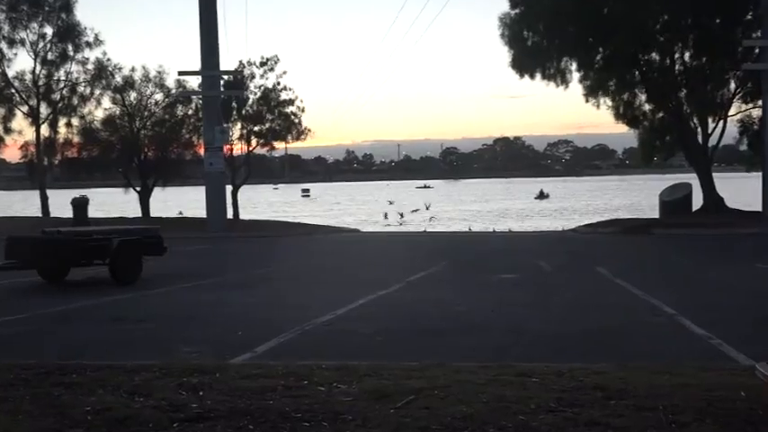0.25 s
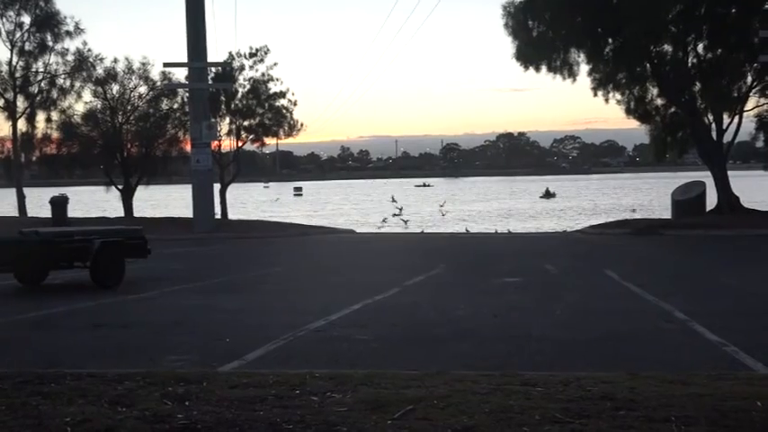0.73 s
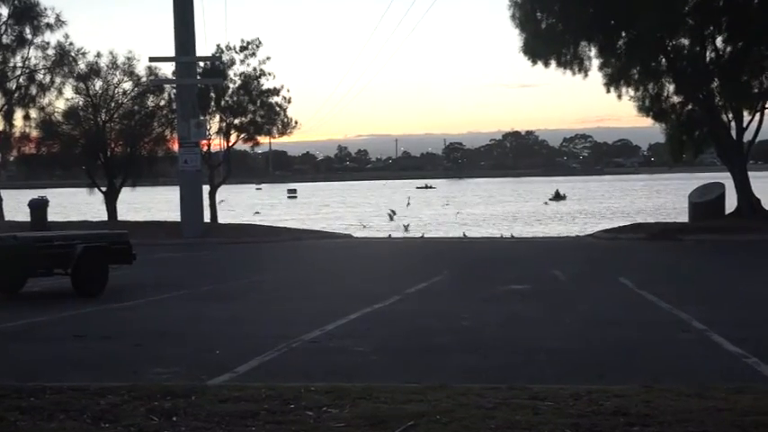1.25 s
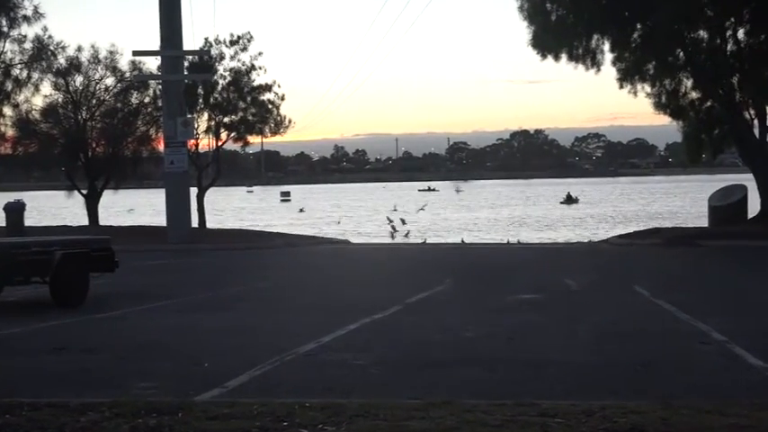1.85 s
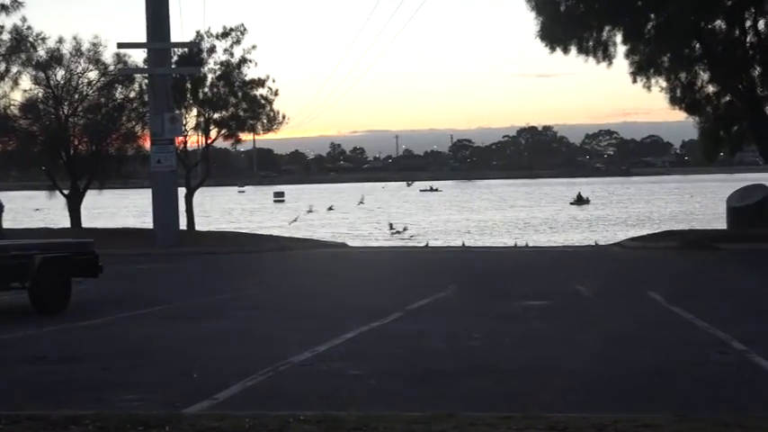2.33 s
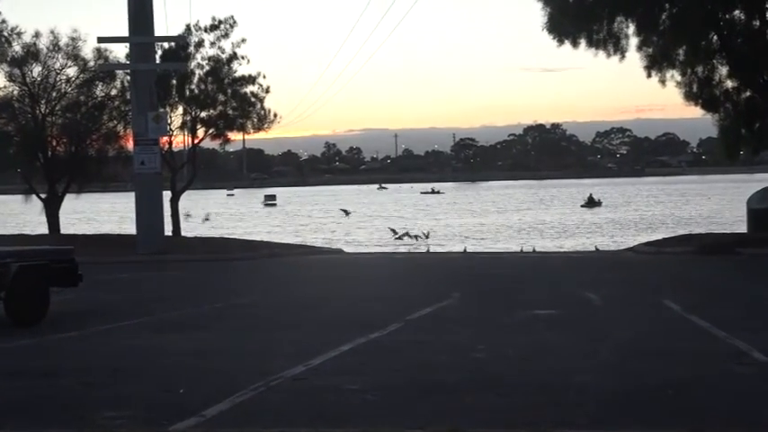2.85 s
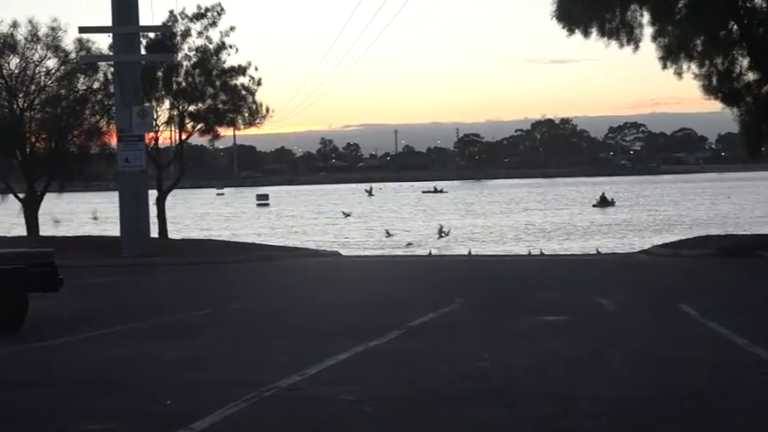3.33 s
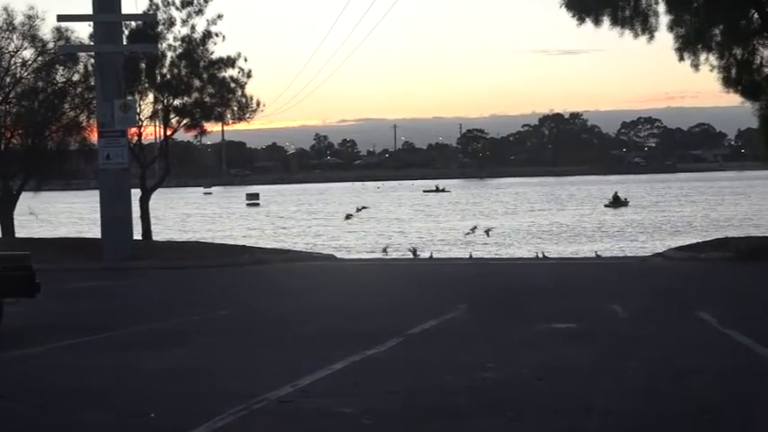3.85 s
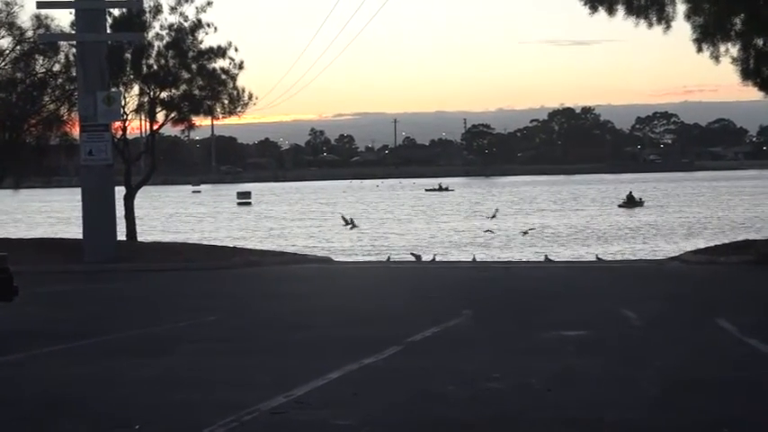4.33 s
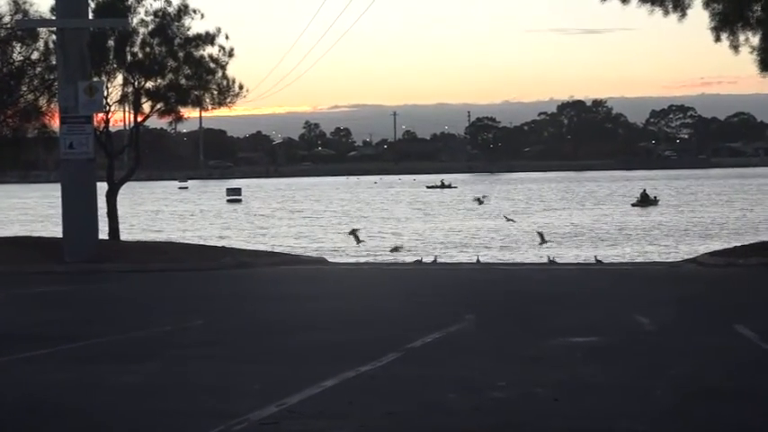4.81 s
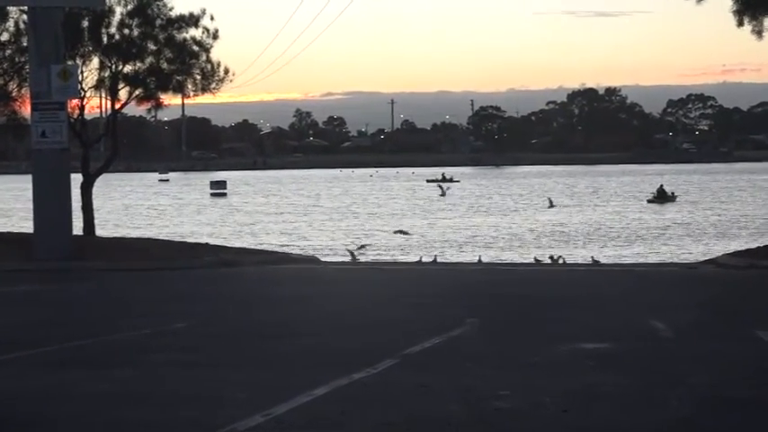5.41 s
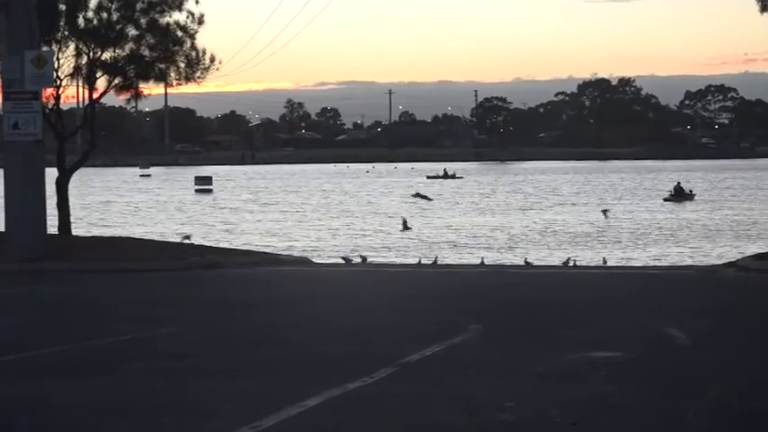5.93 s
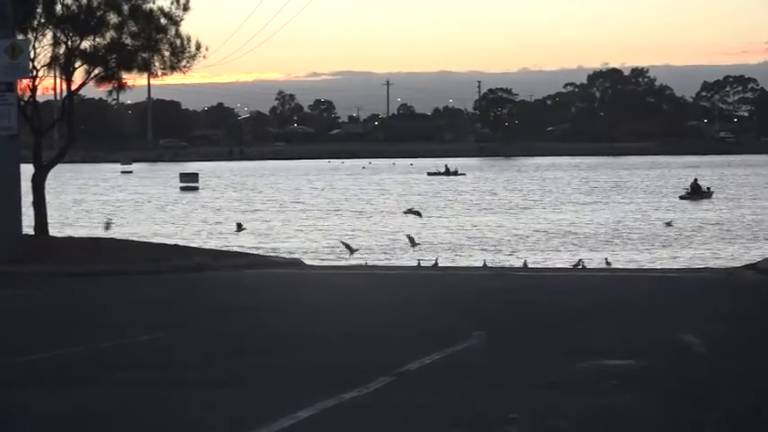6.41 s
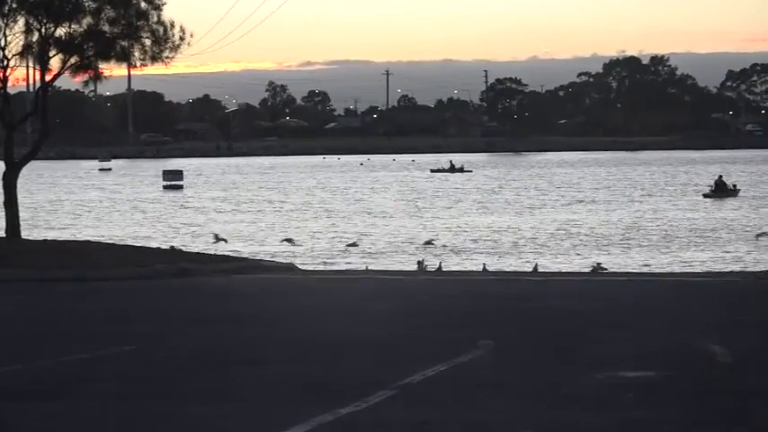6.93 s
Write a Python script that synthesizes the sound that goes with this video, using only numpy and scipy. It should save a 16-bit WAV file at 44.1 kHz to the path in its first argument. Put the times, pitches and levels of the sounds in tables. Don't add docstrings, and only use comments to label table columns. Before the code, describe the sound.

A flock of gulls squawks beside a lake, distant chatter giving way to ever nearer, harsher screeches and shrill whistles, with wind thudding on the microphone.

```python
import sys
import numpy as np
from scipy import signal
from scipy.fft import rfft, irfft, next_fast_len
from scipy.io import wavfile
from scipy.ndimage import uniform_filter1d

SR = 44100
rng = np.random.default_rng(int(sys.argv[2]) if len(sys.argv) > 2 else 0)


def nominal_scale(level):
    x = np.asarray(level, float) / 20
    return 10 ** x


def unload_audio(sound):
    columns = np.transpose(np.atleast_2d(sound))
    steps = np.round(np.clip(columns, -1, 1) * 32767)
    wavfile.write(sys.argv[1], SR, steps.astype(np.int16))


N = 316197
TIME = np.arange(N) / SR


def unit_power(x):
    return x / np.sqrt(np.mean(x ** 2) + 1e-20)


def in_time(rows):
    s, *columns = np.transpose(rows)
    return [np.interp(TIME, s, column) for column in columns]


def colour(x, points):
    hz, db = np.transpose(points)
    size = next_fast_len(N, real=True)
    log_hz = np.log(np.arange(size // 2 + 1) * SR / size + 1e-3)
    weight = nominal_scale(np.interp(log_hz, np.log(hz), db, -90, -90))
    return unit_power(irfft(rfft(x, size) * weight, size)[:N])


def drift(rate_hz):
    r = np.exp(-2 * np.pi * rate_hz / SR)
    return unit_power(signal.lfilter([1], [1, -2 * r, r * r], rng.standard_normal(N + SR))[SR:])


def sweep(hz):
    return 2 * np.pi * np.cumsum(hz) / SR


def rough_voice(pitch_hz, chaos, breath, depth=.45):
    climb = np.cumsum(42 * np.exp(.5 * drift(8)) / SR) % 1
    shake = sweep(115 * np.exp(.15 * drift(10)))
    lurch = .24 * climb - .12 + .065 * drift(90) + .045 * np.cos(shake)
    phase = sweep(pitch_hz * np.exp(chaos * lurch))
    stack = sum(np.sin(k * phase + k * k) * (k * pitch_hz < 13500) for k in range(1, 15))
    uneven = 1 + .5 * chaos * (drift(20) > .3) * np.sin(phase / 2)
    rattle = 1 + depth * chaos * np.sin(shake)
    return nominal_scale(1.82 * drift(52)) * rattle * (unit_power(stack * uneven) + breath * rng.standard_normal(N))


# frequency in Hz, level in dB.
NEAR_THROAT = [(900, -19.5), (1340, -13.5), (2100, -11), (2600, -2.5), (3800, 4), (4700, -0.5), (5250, 1),
               (6500, -12.5)]
# frequency in Hz, level in dB.
BEAK = [(5800, -49), (6500, -1.5), (7500, 1), (8600, -10.5), (10000, -13.5), (11800, -8.5), (14000, -17),
        (15500, -22)]
# frequency in Hz, level in dB.
CAW = [(1100, -13), (1400, -5), (1700, 4), (2000, -5.5), (2400, -25)]


def through_body(source, throat, gain, bright, hoarse):
    return gain * (colour(source, throat) + bright * colour(source, BEAK) + hoarse * colour(source, CAW))


def stir():
    rise_db_per_s, fall_db_per_s, far_db = 153, 150, -14
    peak = 0.41
    calls = NEAR_SQUAWKS + [(s, length, hz, db + far_db, bright) for s, length, hz, db, bright in FAR_SQUAWKS]
    s = TIME[::64]
    slopes = []
    for start, length, _, db, _ in calls:
        to_come = rise_db_per_s * (start + peak * length - s)
        gone_by = fall_db_per_s * (s - start - length)
        slopes.append(db - np.maximum(0, np.maximum(to_come, gone_by)))
    return np.interp(TIME, s, np.max(slopes, axis=0))


def crowd(stir_db):
    first_db, last_db, follows = -54.5, -48.5, 0.25
    level_db = np.linspace(first_db, last_db, N) + follows * (stir_db + 43.5)
    voice = rough_voice(1100, chaos=1.5, breath=0.92, depth=0.094)
    return through_body(voice, NEAR_THROAT, nominal_scale(level_db), bright=nominal_scale(-11.5), hoarse=nominal_scale(-12))


# start in seconds, end in seconds, level in dB.
STEADY_SHRILL = (2.386, 3.3, -42)


def shrill_chorus(stir_db):
    start, end, steady_db = STEADY_SHRILL
    spell_db = steady_db - 40 * np.maximum(0, np.maximum(start - TIME, TIME - end))
    level_db = np.clip(-39 + 0.57 * (stir_db + 31.0), spell_db, -36)
    out = 0
    for hz in (5270, 5380, 5400, 5600):
        phase = sweep(hz * (1 + 0.0085 * drift(10) + .022 * drift(148.8)))
        out = out + nominal_scale(4.2 * drift(38) + 1.1 * drift(90)) * np.sin(phase)
    return nominal_scale(level_db - 8.5) * unit_power(out)


# time in seconds, level in dB.
WIND = [(0.0, -49), (1.04, -47), (1.28, -52), (1.72, -46.5), (2.85, -56.5), (2.87, -49.5), (3.24, -63.5),
        (3.41, -37.5), (3.45, -50.5), (3.91, -60.5), (3.95, -46), (4.57, -56), (4.61, -48.5), (5.63, -53),
        (6.57, -42.5), (6.71, -55.5), (6.89, -43.5), (7.17, -54.5)]
# start in seconds, peak in dB, frequency in Hz.
BUFFETS = [(0.439, -58, 163), (0.534, -36, 183), (0.601, -63, 129), (0.825, -36, 150), (0.927, -45, 118),
           (1.024, -36, 194), (1.461, -31, 95), (1.527, -37, 151.8), (1.676, -34.5, 184.7),
           (1.712, -42, 178), (1.869, -23.5, 212), (2.049, -34.5, 151.4), (2.897, -36.5, 166.7),
           (3.406, -29.5, 109.3), (4.04, -33, 130.9), (4.062, -33.5, 82), (4.622, -33.5, 77.3),
           (3.37, -36, 94), (4.292, -39.5, 128), (4.474, -40.5, 91), (5.312, -34, 91.2), (6.334, -27, 134),
           (6.47, -30.5, 191), (6.54, -41, 143.4), (6.777, -30.5, 118), (6.868, -26, 161),
           (7.023, -30.5, 129.8)]
# frequency in Hz, density in dB per Hz.
GUST = [(15, -11.5), (35, 4), (70, 0.5), (150, -6.5), (300, -13), (600, -24), (1500, -33)]


def wind():
    lumps = nominal_scale(2.5 * drift(18) + .4 * drift(6)) * rng.standard_normal(N)
    out = nominal_scale(in_time(WIND)[0]) * colour(lumps, GUST)
    for s, db, hz in BUFFETS:
        first = round(s * SR)
        cycles = np.maximum(TIME - s, 0)[first:first + SR // 10] * hz
        onset = -np.expm1(-(cycles / .13) ** 2)
        ring = np.sin(2 * np.pi * cycles ** .65) * np.exp(-cycles / 1.1)
        out[first:first + len(cycles)] += nominal_scale(db) * ring * onset
    return out


# frequency in Hz, density in dB per Hz.
FAR_AIR = [(100, -30), (300, -10), (600, -7.5), (950, -0.5), (1300, -8), (3000, -9), (5000, -104),
           (8500, -31), (12000, -34.5), (15500, -41)]


def far_air():
    swells = nominal_scale(1.5 * drift(5))
    return nominal_scale(-56.0) * colour(swells * rng.standard_normal(N), FAR_AIR)


def notes(rows, overtone_db=-24.5):
    out, flutter_db = np.zeros(N), 2.5 * np.tanh(drift(105))
    quaver = drift(120)
    for s, length, start_hz, middle_hz, end_hz, db in rows:
        at = np.arange(round(s * SR), min(N, round((s + length) * SR)))
        x = np.linspace(-1, 1, len(at))
        bend_hz = (start_hz + end_hz) / 2 - middle_hz
        hz = middle_hz + (end_hz - start_hz) / 2 * x + bend_hz * x ** 2
        rasp = .004 if db > -26 else .009 if db > -38 else .022
        phase = sweep(hz * (1 + rasp * quaver[at]))
        edge = np.clip((1 - abs(x)) * length / 0.0073, 0, 1)
        edge = edge * nominal_scale(flutter_db[at] * (.5 if db > -26 else 1))
        second = nominal_scale(overtone_db - 3.3 * (start_hz > 4900) + 4.3 * (end_hz > 1.15 * start_hz))
        out[at] += nominal_scale(db + 8.0 - 1.9 * x) * edge * (np.sin(phase) + second * np.sin(2 * phase))
    return out


def arched(rows, start, end):
    return notes([(s, length, hz * start, hz, hz * end, db) for s, length, hz, db in rows])


def bowed(rows):
    return notes([(s, length, first, first + 0.68 * (last - first), last, db)
                  for s, length, first, last, db in rows])


# start in seconds, length in seconds, start pitch in Hz, end pitch in Hz, rms level in dB.
BENDS = [(4.793, 0.038, 4780, 5375, -38.5), (0.014, 0.03, 3180, 3320, -44.5),
         (0.079, 0.047, 3060, 3265, -41), (2.661, 0.039, 3050, 3395, -36.5),
         (2.748, 0.019, 3150, 3330, -41.5), (3.428, 0.049, 2770, 3270, -48),
         (0.034, 0.013, 4300, 4840, -54), (0.065, 0.014, 4700, 4270, -56), (0.123, 0.04, 4570, 3900, -60),
         (.211, 0.034, 4170, 3610, -50.5), (2.578, 0.17, 4220, 4660, -50), (4.826, 0.011, 2930, 3980, -35),
         (4.91, 0.042, 3830, 4540, -31.5), (5.337, 0.015, 3430, 4580, -30),
         (5.374, 0.007, 3540, 4870, -17), (5.823, 0.046, 1080, 1330, -48),
         (6.634, 0.02185, 1230, 1430, -45), (5.899, 0.011, 2678, 4776, -24.5),
         (5.931, 0.015, 2780, 4750, -20.5), (6.635, 0.033, 2460, 3070, -38.5),
         (6.679, 0.03, 3327, 4570, -32), (6.727, 0.022, 3550, 4505, -29),
         (7.077, 0.016, 3200, 3390, -33.5), (7.094, 0.032, 3510, 3746, -32.5),
         (7.138, 0.011, 3090, 4450, -30.5)]


def bends():
    return bowed(BENDS)


# start in seconds, length in seconds, start pitch in Hz, end pitch in Hz, rms level in dB.
STROKES = [(.216, .04, 3100, 2750, -54), (.253, .014, 2700, 1700, -54), (.278, .055, 1780, 1480, -52),
           (.03, .018, 2450, 2200, -56), (.154, .016, 1700, 1900, -55), (.222, .022, 5000, 5150, -59),
           (1.323, .028, 2300, 1900, -54), (1.244, .022, 3900, 4250, -57), (1.408, .026, 2850, 3250, -50),
           (1.505, .03, 2900, 3050, -50), (1.525, .025, 1900, 1750, -52), (1.563, .036, 2450, 2350, -54),
           (1.563, .036, 3350, 3200, -55), (1.68, .055, 7200, 7150, -63), (1.586, .035, 6100, 6350, -63),
           (1.65, .04, 5950, 5900, -62), (1.698, .012, 1750, 1600, -50), (1.716, .012, 1800, 1650, -51),
           (1.733, .012, 1800, 1600, -50), (1.698, .012, 2350, 2250, -53), (1.733, .012, 2350, 2250, -53),
           (2.822, .024, 2150, 2050, -53), (2.585, .06, 2550, 2750, -58), (.655, .03, 1950, 1650, -49),
           (.872, .03, 3750, 3300, -53), (.922, .018, 2650, 2550, -51), (.738, .02, 3150, 3000, -56),
           (1.982, .026, 2200, 2300, -55), (2.07, .016, 3100, 3300, -48), (1.77, .085, 1500, 1480, -58),
           (3.585, .012, 4600, 4500, -50), (3.665, .035, 1950, 1600, -52), (4.88, .014, 1800, 2050, -43),
           (5.515, .03, 3000, 4300, -47), (4.762, .02, 4100, 4450, -47), (4.775, .02, 3700, 3100, -49)]


def far_strokes():
    return bowed(STROKES)


# start
# in seconds, length in seconds, pitch in Hz, rms level in dB.
WHISTLES = [(4.927, 0.044, 5063, -32), (4.934, 0.045, 5420, -31), (5.292, 0.024, 5150, -28),
            (5.311, 0.027, 5460, -32.5), (5.384, 0.012, 5290, -16.5), (5.852, 0.018, 5230, -29),
            (5.874, 0.02, 5340, -25.5), (5.891, 0.012, 5140, -24), (5.92, 0.015, 5300, -22),
            (5.9, 0.0069, 5270, -23), (5.943, 0.022, 5114, -14.5), (5.961, 0.012, 5180, -17),
            (5.969, 0.015, 5190, -16.5), (6.006, 0.064, 5680, -37.5), (6.07, 0.066, 5670, -46),
            (6.7, 0.0069, 5230, -20.5), (6.721, 0.011, 5046, -35), (6.741, 0.0477, 5323, -23.5),
            (6.79, 0.041, 5160, -31), (6.832, 0.026, 5120, -31.5), (7.152, 0.017, 5050, -24.5),
            (7.163, 0.008, 5680, -24.5), (.046, 0.019, 5350, -50.5), (.88, 0.059, 5600, -53),
            (1.82, 0.02, 5300, -54), (2.026, 0.05, 5400, -58),
            (1.16, .026, 5550, -57), (1.238, .016, 5350, -55), (2.205, .02, 5300, -50),
                (2.448, .04, 5450, -44), (2.63, .024, 5400, -49), (2.7, .035, 5400, -45),
                (2.85, .03, 5400, -48), (2.97, .03, 5400, -49), (3.125, .07, 5350, -47),
                (4.29, .07, 5350, -42), (4.36, .045, 5150, -43), (4.425, .03, 5400, -42),
                (5.54, .032, 5330, -36), (5.988, .008, 5200, -28), (4.865, .008, 5050, -33),
                (4.845, .012, 5200, -35)]


def whistles():
    return arched(WHISTLES, start=0.99, end=1.002)


# start in seconds, length in seconds, middle pitch in Hz, rms level in dB.
CLUCKS = [(.051, 0.056, 1620, -51.5), (.156, 0.022, 2160, -45.5), (.285, 0.049, 2420, -51.5),
          (.528, 0.048, 1865, -51), (.667, 0.016, 2260, -42.5), (.885, 0.024, 1920, -49),
          (.89, 0.018, 2470, -45.5), (1.232, 0.024, 2150, -48), (1.947, 0.019, 1864, -54),
          (2.064, 0.016, 2190, -45), (3.532, 0.015, 2380, -43.5), (3.834, 0.03, 2325, -48.5),
          (4.63, 0.048, 1880, -46), (4.66, 0.021, 1634, -42), (6.669, 0.0159, 1870, -34.5),
          (6.748, 0.043, 3440, -35), (6.801, 0.021, 3580, -36.5), (6.958, 0.046, 3116, -54),
          (6.97, 0.057, 1775, -48), (7.063, 0.043, 3730, -37.5), (7.104, 0.012, 4535, -30)]


def clucks():
    return arched(CLUCKS, start=1.015, end=0.96)


# start in seconds, length in seconds, lowest pitch in Hz, rms level in dB.
CHATTER = [(.142, 0.011, 2920, -41), (.153, 0.04, 3100, -51), (.53, 0.038, 2840, -49.5),
           (.652, 0.016, 2850, -44), (.805, 0.012, 2900, -43), (1.23, 0.027, 3170, -48.5),
           (1.307, 0.018, 3080, -41), (1.384, 0.021, 2890, -38.5), (1.453, 0.025, 2897, -43),
           (1.471, 0.023, 3083, -41.5), (1.895, 0.024, 2995, -41), (1.922, 0.016, 3200, -39),
           (2.001, 0.011, 3270, -40.5), (2.05, 0.022, 3000, -41.5), (.53, 0.041, 3660, -53.5),
           (2.805, 0.034, 2860, -46.5), (3.24, .031, 4520, -51), (3.269, 0.041, 4370, -51),
           (3.511, 0.02, 3130, -35), (4.137, 0.035, 3590, -53), (6.992, 0.043, 3182, -48)]


def chatter():
    return arched(CHATTER, start=1.06, end=1.027)


def squawks(rows, throat, glide_hz_per_s, caw_db):
    scoop, scoop_s = .15, .02
    pitch_hz, chaos, gate = np.full(N, 1e3), np.ones(N), np.zeros(N)
    db, bright_db = np.full(N, -45.), np.full(N, -20.)
    top_db = max(row[3] for row in rows)
    for start, length, first_hz, level_db, brightness_db in rows:
        end = start + length
        at = slice(round(start * SR), round((end + .03) * SR))
        age = abs(TIME[at] - start)
        glide_hz = glide_hz_per_s * length * np.sqrt(age / length)
        pitch_hz[at] = first_hz + glide_hz - first_hz * scoop * np.exp(-age / scoop_s)
        chaos[at] = np.clip((age / .045) ** 4, .08 if level_db == top_db else .6, 1)
        db[at], bright_db[at] = level_db, brightness_db
        swell = nominal_scale(level_db - 2.5 - 3.0 * (1 - age / (end - start)))
        rise = np.clip(age / 0.033, 0, 1)
        fall = np.clip((end + 0.043 - TIME[at]) / 0.079, 0, 1)
        gate[at] = np.maximum(gate[at], swell * rise * fall)
    breath = np.clip(-.04 * (db + 17), .35, .75) * (.4 + .6 * chaos)
    voice = rough_voice(pitch_hz, chaos, breath)
    return through_body(voice, throat, gate, nominal_scale(bright_db), nominal_scale(caw_db - 0.93 * db))


# start in seconds, length in seconds, first pitch in Hz, level in dB, brightness in dB.
FAR_SQUAWKS = [(0.215, 0.058, 852, -49, -30), (0.493, 0.086, 962, -53.5, -27),
               (0.631, 0.087, 955, -48, -17), (0.792, 0.029, 972, -41, -20), (0.852, 0.1, 980, -44.5, -31),
               (1.377, 0.036, 1017, -31.5, -30), (1.441, 0.14, 1002, -37, -25),
               (1.649, 0.17, 787, -46.5, -27), (1.866, 0.075, 1012, -38, -37), (2.053, 0.21, 966, -38, -21),
               (2.831, 0.49, 901, -49.5, -5.5)]
# frequency in Hz, level in dB.
FAR_THROAT = [(800, 0), (1300, -57), (1800, -44), (2300, 8.5), (3000, 6.5), (3800, 6.5), (4500, -10),
              (6500, -8.5)]


def far_squawks():
    return squawks(FAR_SQUAWKS, FAR_THROAT, glide_hz_per_s=-300, caw_db=-41.0)


# start in seconds, length in seconds, start pitch in Hz, end pitch in Hz, rms level in dB.
LINGERS = [(4.948, .035, 3300, 3060, -46), (4.98, .05, 3050, 3060, -47), (5.03, .13, 3050, 3030, -54),
           (5.04, .058, 3280, 3270, -51), (5.1, .022, 3250, 3200, -48), (5.103, .022, 2350, 2300, -55),
           (4.96, .07, 1500, 1600, -54), (5.05, .06, 1600, 1650, -56), (4.2, .055, 5050, 5450, -49),
           (4.255, .07, 4500, 4250, -47), (4.345, .065, 4350, 4050, -44), (4.285, .04, 3600, 3750, -46),
           (1.92, .095, 4250, 4100, -54), (.715, .06, 5450, 5650, -59), (.765, .04, 960, 940, -56),
           (6.855, .05, 5150, 4950, -38), (4.45, .1, 5400, 5400, -48), (6.01, .04, 1650, 1520, -48),
           (6.435, .03, 1400, 1750, -48)]


def lingers():
    return bowed(LINGERS)


# start in seconds, length in seconds, first pitch in Hz, level in dB, brightness in dB.
NEAR_SQUAWKS = [(2.349, 0.14, 1278, -37, -8.5), (2.62, 0.12, 1257, -39, -7), (2.84, 0.16, 1226, -37.5, -24),
                (3.048, 0.073, 1245, -45.5, -4), (3.278, 0.15, 1237, -42, -10),
                (3.576, 0.11, 1114, -27.5, -21.5), (3.828, 0.11, 1200, -32, -12),
                (4.194, 0.15, 1283, -37.5, -7.5), (4.277, 0.14, 1298, -27, -10.5),
                (4.606, 0.13, 886, -35.5, -12.5), (4.79, 0.16, 1043, -24.5, -6.5),
                (5.155, 0.15, 1277, -23.5, -20), (5.293, 0.088, 1329, -20.5, -4.5),
                (5.68, 0.15, 1140, -42.5, -30), (5.824, 0.13, 1294, -19.5, -4.5),
                (5.99, 0.21, 1123, -31.5, -12.5), (6.433, 0.24, 1120, -30.5, -16),
                (6.643, 0.13, 875, -23, -12), (6.737, 0.08, 906, -22.5, -14),
                (6.942, 0.076, 1074, -60, -38), (7.048, 0.11, 999, -28, -6)]


def near_squawks():
    return squawks(NEAR_SQUAWKS, NEAR_THROAT, glide_hz_per_s=550, caw_db=-83.0)


# time in seconds, pitch in Hz, fundamental in dB, second partial in dB.
CRIES = [
    [(2.52, 1047, -61, -82), (2.786, 1156, -60.5, -84), (2.86, 1076, -62, -65)],
    [(6.44, 930, -52, -56), (6.48, 1122, -44.5, -56), (6.66, 1108, -48, -52), (6.93, 1074, -50.5, -67),
     (7.115, 1013, -49, -52)],
    [(5.36, 828, -58, -53), (5.398, 906, -49.5, -40.5), (5.425, 930, -52.5, -68), (5.49, 938, -50.5, -78),
     (5.6, 893, -49.5, -50.5), (5.85, 928, -49, -53.5), (6.1, 863, -52.5, -42), (6.17, 911, -46.5, -45.5),
     (6.215, 757, -62, -46)],
]
CRY_HOARSENESS = (.6, 1., .3)


def cries():
    out = 0
    for rows, hoarse in zip(CRIES, CRY_HOARSENESS):
        hz, first_db, second_db = in_time(rows)
        edge = np.clip(np.minimum(TIME - rows[0][0], rows[-1][0] - TIME) / 0.0086, 0, 1)
        phase = sweep(hz * (1 + hoarse * (.005 * drift(40) + .035 * drift(200))))
        rasp = 1 + np.clip((second_db - first_db) / 12, 0, .5) * drift(160)
        tone = nominal_scale(first_db) * np.sin(phase) + nominal_scale(second_db) * rasp * np.sin(2 * phase)
        out = out + edge * nominal_scale(2.95 * hoarse * drift(180)) * tone
    return np.sqrt(2) * out


# start in seconds, number of strokes, gap in seconds, start pitch in Hz,
# end pitch in Hz, first level in dB, dB gained a stroke.
RATTLE = (5.19, 12, .0082, 5600, 4750, -37, .8)


def rattle_run():
    start, count, gap, high, low, first_db, gain_db = RATTLE
    rows = []
    for k, (late, sharp, strong) in enumerate(rng.standard_normal((count, 3))):
        s = start + gap * (k + .08 * late)
        top, bottom = high * (1 + .03 * sharp), low * (1 + .03 * sharp)
        rows.append((s, .9 * gap, top, (top + bottom) / 2, bottom, first_db + gain_db * k + 2 * strong))
    return notes(rows, overtone_db=-20)


# start in seconds, length in seconds, start pitch in Hz, end pitch in Hz, rms level in dB.
SLIPS = [(5.862, .007, 2700, 4200, -32), (5.864, .011, 3900, 3150, -28), (5.886, .008, 2700, 4800, -28),
         (5.903, .011, 3900, 3100, -27), (5.34, .03, 4550, 4050, -34), (5.39, .038, 5350, 5020, -26),
         (5.884, .016, 2600, 2700, -31), (5.92, .014, 2600, 2750, -29), (5.912, .022, 1450, 1280, -38),
         (6.707, .014, 3950, 3600, -31), (6.715, .012, 1850, 2100, -36), (6.785, .013, 3200, 4000, -34),
         (6.81, .026, 3400, 4100, -37), (6.655, .012, 3200, 4200, -36), (6.73, .012, 2800, 3200, -36),
         (7.047, .02, 2250, 2600, -43), (7.08, .016, 4500, 5300, -39), (7.129, .018, 3750, 2950, -30),
         (7.132, .01, 4000, 4300, -34), (7.088, .014, 1800, 2000, -40), (7.111, .01, 1550, 1450, -40),
         (7.155, .015, 4400, 4500, -34)]


def slips():
    return bowed(SLIPS)


# delay in seconds, level in dB.
ECHOES = [
    (.004, -12),
    (.047, -34),
]


def outdoors(x, tail_db, t60_s):
    age = np.arange(SR // 2) / SR
    response = nominal_scale(tail_db - 60 * age / t60_s) * rng.standard_normal(len(age)) * (age > .01)
    response[0] = 1
    for delay, db in ECHOES:
        response[round(delay * SR)] += nominal_scale(db)
    return signal.fftconvolve(x, response)[:N]


def scene():
    stir_db = stir()
    flock = crowd(stir_db) + shrill_chorus(stir_db) + cries()
    clear = bends() + far_strokes() + whistles() + clucks() + chatter() + lingers() + slips()
    calls = far_squawks() + near_squawks()
    near = outdoors(clear + calls, tail_db=-35.5, t60_s=0.23) + rattle_run()
    left = nominal_scale(6) * (flock + wind() + far_air()) + near
    return np.array([left, 0 * left])


# frequency in Hz, density in dB per Hz.
HISS = [(15, 0), (60, 0), (170, -4), (350, -10), (700, -15), (2500, -21), (5000, -24), (8000, -34),
        (15500, -45)]
# frequency in Hz, density in dB per Hz.
AMP_NOISE = [(15, 0), (200, -6), (1000, -12), (7000, -17), (10000, -23), (15500, -26)]


def empty_input(left):
    level_db = 10 * np.log10(uniform_filter1d(left ** 2, SR // 20) + 1e-12)
    release_db = 150 * TIME
    held_db = np.maximum.accumulate(level_db + release_db) - release_db
    duck = nominal_scale(-1.6 * np.maximum(held_db + 40, 0))
    hiss = nominal_scale(-67) * colour(rng.standard_normal(N), HISS)
    leak = signal.lfilter([.15], [1, -.85], nominal_scale(-28) * left)
    leak = leak + signal.lfilter([.006], [1, -.994], nominal_scale(-27) * left)
    floor = nominal_scale(-75) * colour(rng.standard_normal(N), AMP_NOISE)
    return duck * (hiss + leak) + floor


def band_limit(x):
    return signal.sosfilt(signal.butter(12, 15440, fs=SR, output="sos"), x)


def record(dry):
    left = .9 * np.tanh(dry[0] / .95)
    return band_limit(np.array([left, empty_input(dry[0])]))


dry = scene()
out = record(dry)
unload_audio(out)
```